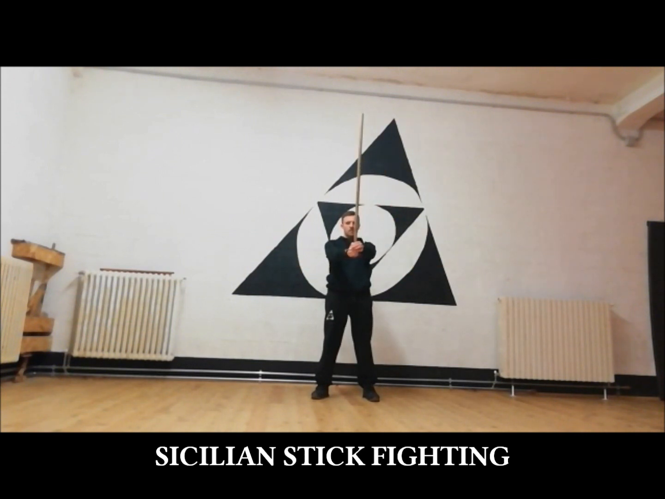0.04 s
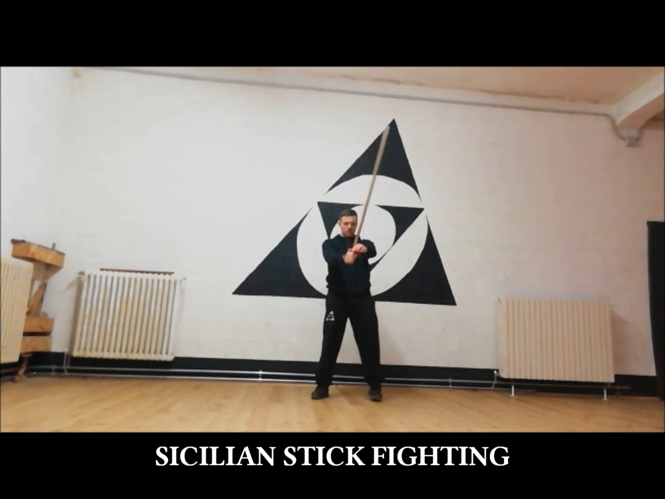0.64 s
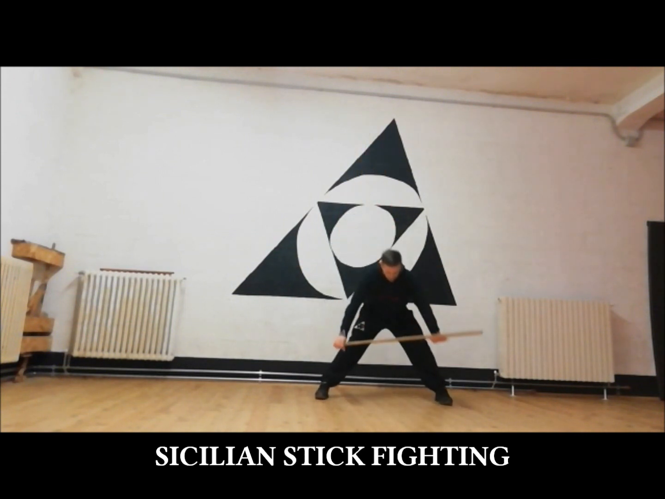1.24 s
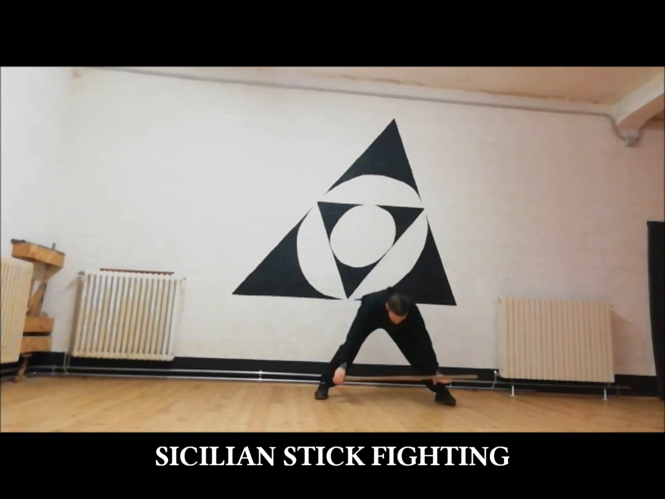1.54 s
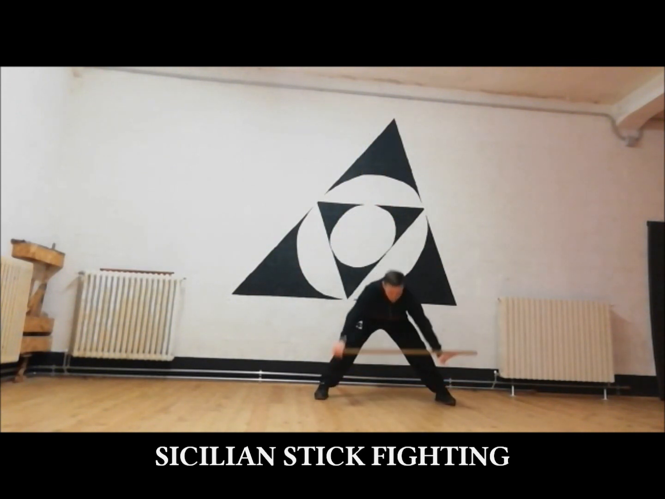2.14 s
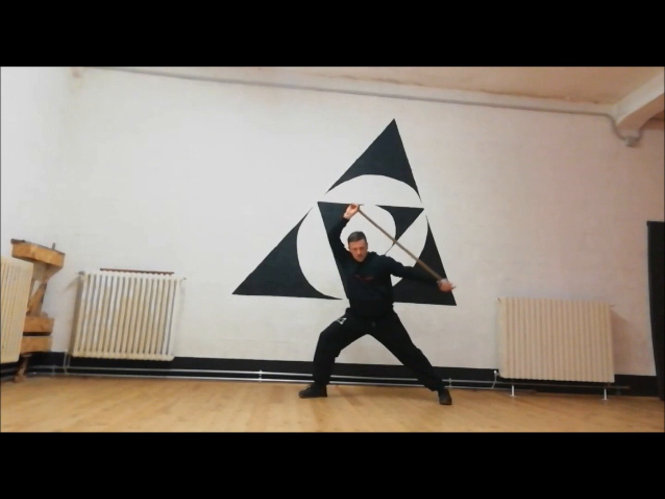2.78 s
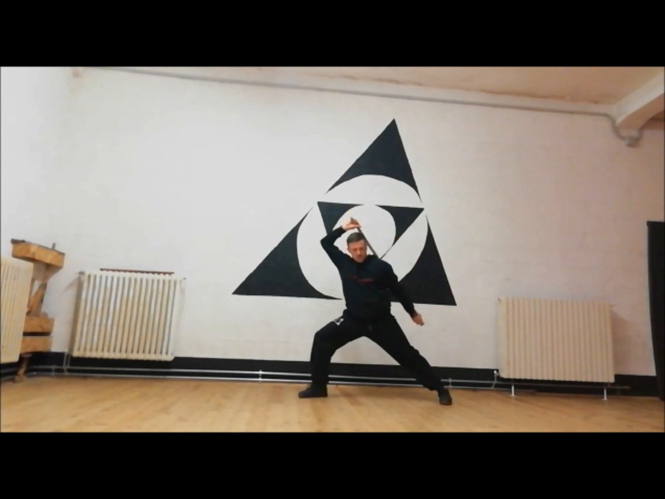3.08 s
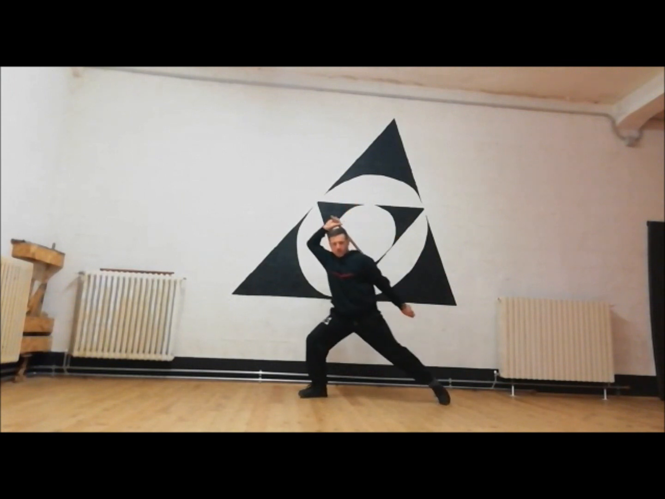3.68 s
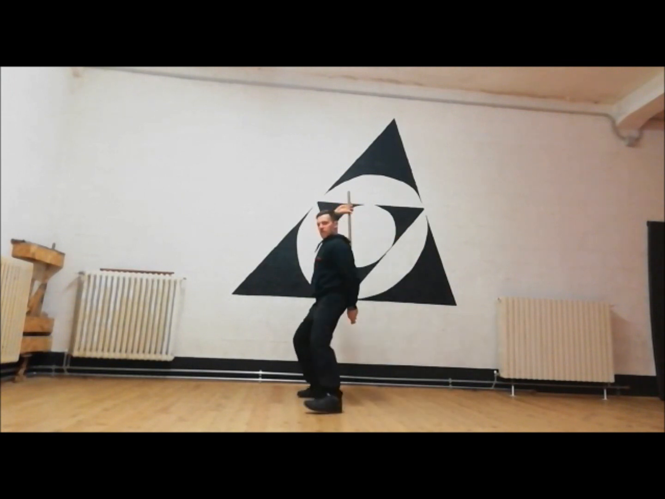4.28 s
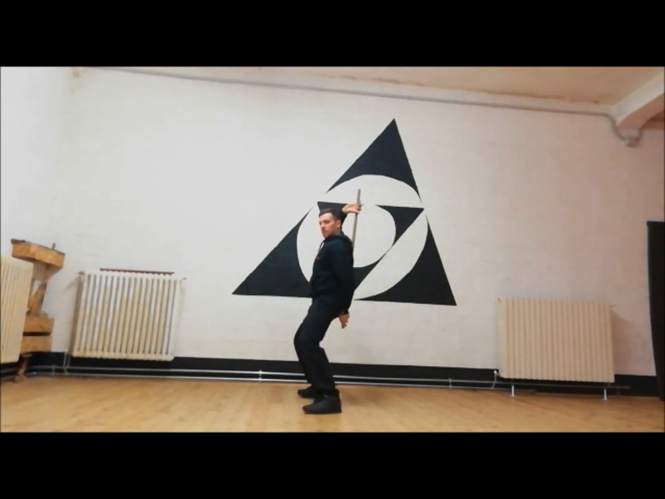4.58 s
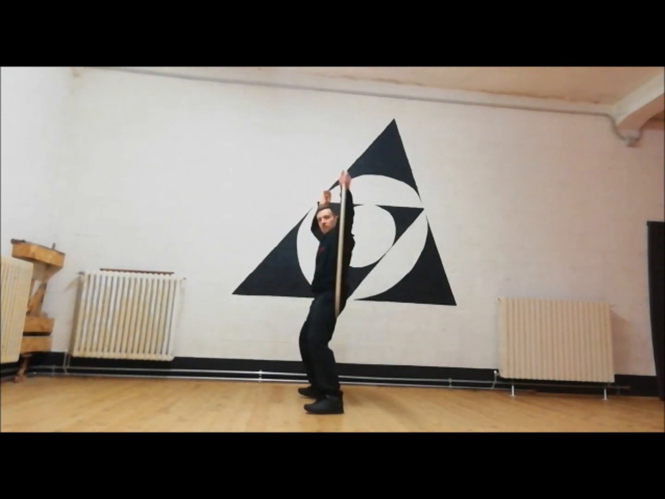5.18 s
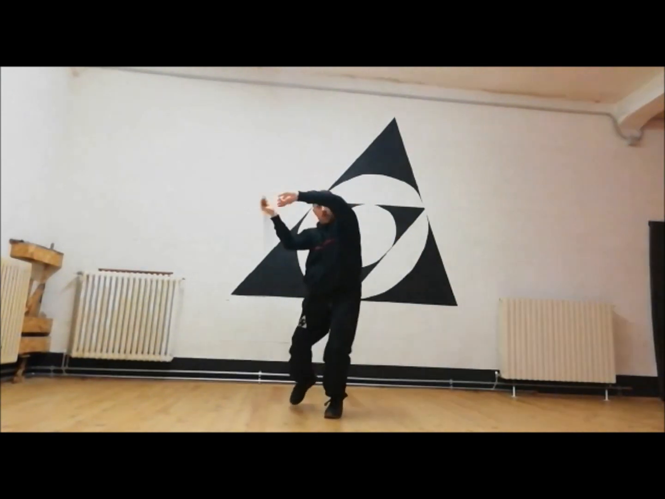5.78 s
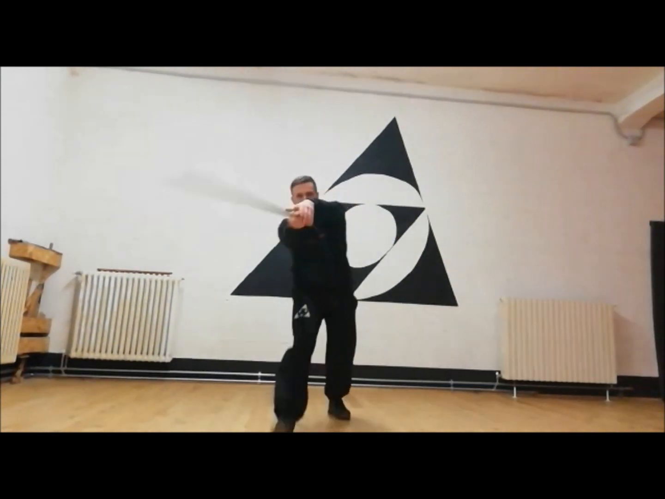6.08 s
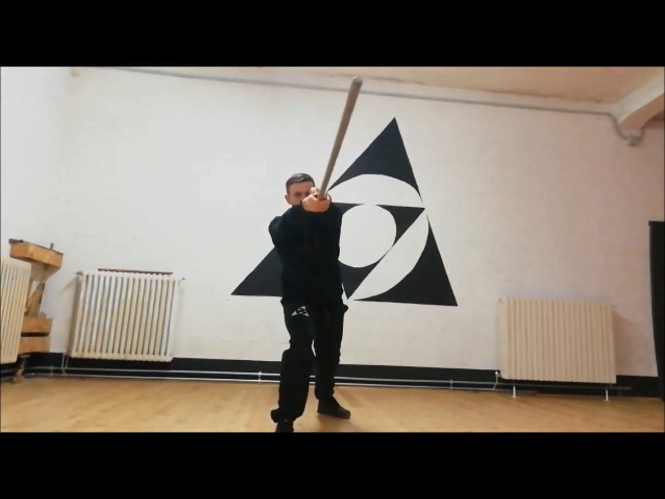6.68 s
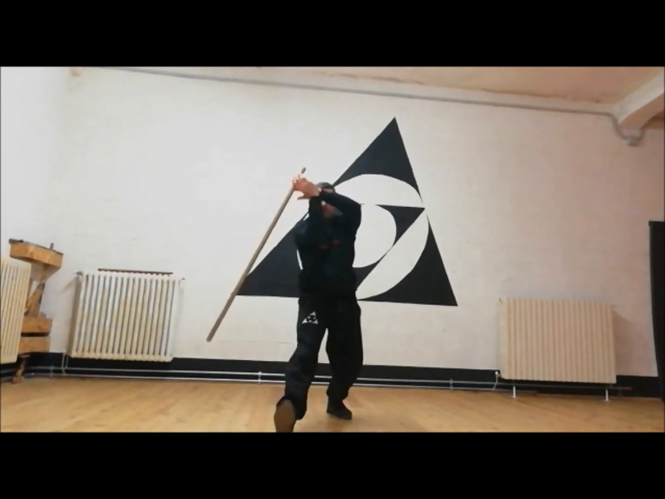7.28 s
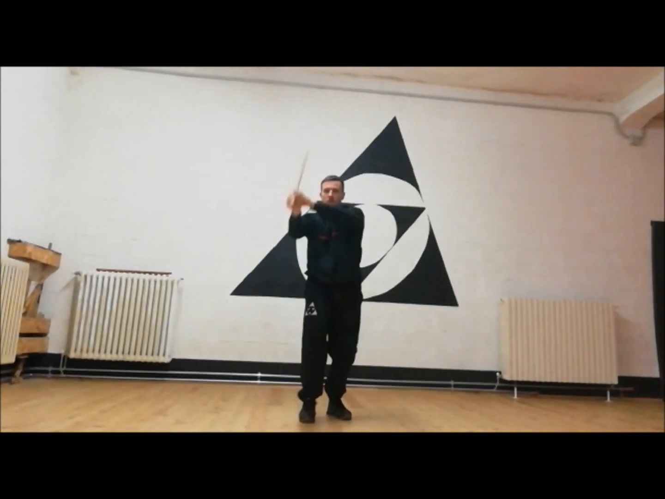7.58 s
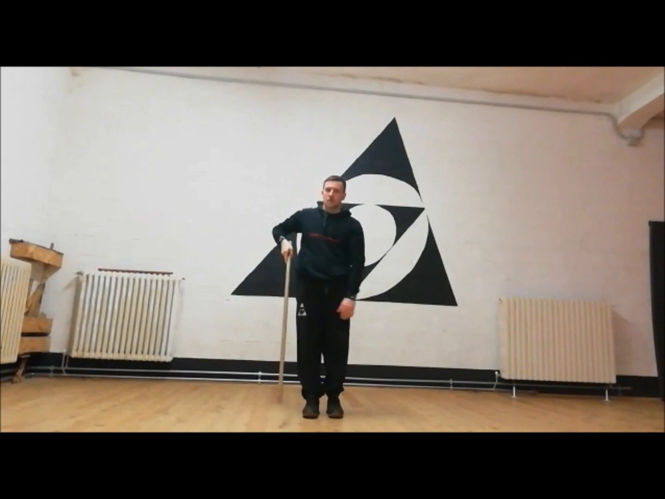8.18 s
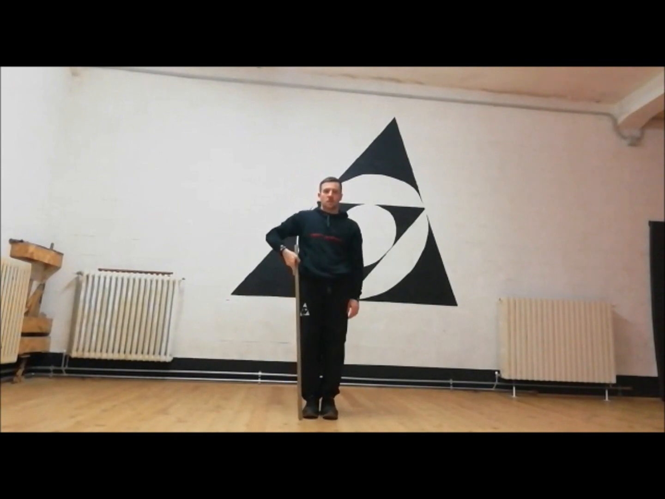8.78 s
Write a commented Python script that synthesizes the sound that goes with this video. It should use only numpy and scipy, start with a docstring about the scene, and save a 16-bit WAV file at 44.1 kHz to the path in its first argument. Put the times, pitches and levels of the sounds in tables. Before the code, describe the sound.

A low hum and faint hiss fill a bare, echoing training room. At about 1.1 seconds a few soft footfalls thud on wooden boards, which ring on briefly; faint shoe slides follow, another near 2.6. Around 3.8 come two steps and a thin squeak, then heavier steps and a scuff near 4.3. From 5 to 5.9 seconds, sleeves rustle among light steps and small wooden knocks. At about 6.2 a stick whooshes and a lunge lands with hard thuds, a slap, a knock and a short squeak, pushing a deep rumble of air at the microphone. A second burst runs from 7.3 to 7.8: quick swishes, a sharp knock and step, another puff of air, sliding soles and flapping cloth. Near 8.8 the stick's butt meets the floor with a loud, dull, hollow thud, followed by a faint slide.

```python
"""In a bare, ringing training room, someone drills with a long stick on the wooden floor.
Shoes thud, slap, slide and squeak on the boards, which ring on under every blow. Sleeves rustle,
wood knocks, lunges push the air and the stick whooshes through two strikes; at last its butt is
set down with a dull thud. A low hum and faint hiss fill the room."""
import sys
import numpy as np
from scipy import signal
from scipy.fft import rfft, irfft, next_fast_len
from scipy.io import wavfile

SR = 44100
rng = np.random.default_rng(int(sys.argv[2]) if len(sys.argv) > 2 else 0)


def to_wav(sig):
    """Store sig (one row per channel, or 1-D mono) as 16-bit WAV at the path in sys.argv[1].

    Samples outside -1..1 are clipped; the rate is SR.
    """
    pcm = np.clip(np.atleast_2d(sig), -1, 1) * 32767
    pcm = np.round(pcm).astype(np.int16)
    wavfile.write(sys.argv[1], SR, pcm.T)  # frames by channels


N = 398663

# Shoes landing. Each row: start in seconds, thud level in dB, thud pitch in Hz,
# hardness in dB (how much louder the heel's knock is than the thud).
FOOTSTEPS = [ (1.141, -52, 283, -14.5), (1.186, -53.5, 260, -10.5), (1.305, -57, 227, -13),
             (3.787, -57, 285, -7.5), (3.865, -49.5, 273, -6), (4.281, -46.5, 203, -14.5),
             (4.344, -46.5, 156, -20), (4.376, -48, 187, -23), (5.190, -58.5, 247, -11),
             (5.257, -60, 270, -2.5), (5.725, -56.5, 296, -11), (5.851, -45, 249, -12),
             (5.902, -49.5, 238, -14.5), (6.219, -49, 225, -1), (6.260, -47.5, 300, 6.5),
             (6.273, -38, 286, -21), (6.279, -39, 162, -8), (7.375, -60, 264, -10), (7.439, -56, 228, -5.5),
             (7.481, -41, 312, -2), (7.628, -49.5, 292, -0.5), (7.777, -53.5, 327, -15.5),
             (8.656, -64, 258, -9.5)]
# The tone of a sole slapping the floor. Each row: frequency in Hz, level in dB.
SOLE_TONE = [(300, -14), (1000, -4.5), (1850, 2.5), (2150, -3), (2600, -3), (3300, -4.5), (4500, -12.5),
             (6300, -14), (7800, -29), (11000, -30), (15000, -30.5)]
# Sliding: shoes, trouser legs, and near 2.56 s the stick sliding through the hands. Each row: loudest moment in
# seconds, # time to swell (and again to fade) in seconds, level in dB, middle frequency in Hz.
SLIDES = [(1.28, 0.14, -62.5, 1600), (1.63, 0.046, -73, 1300), (2.56, 0.12, -57, 2800),
          (4.36, .093, -58, 2760), (5.37, 0.027, -61, 1874), (6.157, 0.047, -50, 3780),
          (6.51, 0.071, -48.5, 1900), (7.387, 0.039, -49, 2150), (7.68, 0.067, -46.5, 1910),
          (8.53, 0.099, -65, 2340), (8.98, 0.18, -61.5, 3950)]


def amp(db):
    """Turns decibels into a number to multiply by."""
    return 10 ** (np.asarray(db) / 20)


def look_up(table, hz):
    """Reads a table at any frequency, joining its rows with straight lines on a pitch scale."""
    row_hz, values = np.transpose(table)
    return np.interp(np.log(hz + 1), np.log(row_hz), values)


def unit_power(x):
    """Scales a signal so that its average power is 1."""
    return x / np.sqrt(np.mean(x ** 2) + 1e-20)


def at_level(x, db):
    """Gives a short sound the energy of a tenth of a second at this level."""
    return amp(db) * x * np.sqrt(SR / 10 / (np.sum(x ** 2) + 1e-20))


def add(mix, start, sound):
    """Mixes a sound in at a start time in seconds."""
    part = mix[max(round(start * SR), 0):][:len(sound)]
    part += sound[:len(part)]


def freqs(size):
    """The frequencies in Hz that make up a sound of this many samples."""
    return np.fft.rfftfreq(size, 1 / SR)


def colour(x, tone):
    """Turns each frequency up or down as a tone table says."""
    return irfft(rfft(x) * amp(look_up(tone, freqs(x.shape[-1]))), x.shape[-1])


def tap_response(tone, size=4096):
    """The sound that a thing with this tone makes after one perfectly sharp tap."""
    log_gain = np.log(amp(look_up(tone, abs(np.fft.fftfreq(size, 1 / SR)))))
    return np.fft.ifft(np.exp(np.conj(signal.hilbert(log_gain)))).real[:size // 2]


def wander(size, hz):
    """A smooth random wobble that changes about hz times a second."""
    smoothing = np.exp(-(freqs(size) / hz) ** 2)
    return unit_power(irfft(rfft(rng.standard_normal(size)) * smoothing, size))


def stroke(rise, fall):
    """A movement that swells and fades. It lasts one second, so add it 0.5 s before its peak."""
    t = np.arange(SR) / SR - .5
    return np.exp(-(t / np.where(t < 0, rise, fall)) ** 2)


def short_note(hz, swell):
    """One pitch that grows for swell seconds and dies away."""
    t = np.arange(SR // 6) / SR
    return np.sin(2 * np.pi * hz * t) * t / swell * np.exp(-t / swell)


def even_out(burst, lead, amount=0.71):
    """Evens out a burst's frequencies, as when many small contacts add up; puts lead seconds in front."""
    spectrum = rfft(np.pad(burst, (round(lead * SR), 0)))
    return irfft(spectrum / (abs(spectrum) + 1e-12) ** amount)


def surrounding_noise(size):
    """Noise from all around: left and right share the bass but differ through most of the treble."""
    # Each row: frequency in Hz, how alike the sides are (1 the same, 0 unrelated, below 0 opposed).
    likeness = [(30, 1), (130, 0.96), (260, 0.86), (500, -0.47), (900, 0.26), (2000, -0.23), (16000, 1)]
    left, other = rfft(rng.standard_normal((2, size)))
    alike = np.clip(look_up(likeness, freqs(size)), -1, 1)
    right = alike * left + np.sqrt(1 - alike ** 2) * other
    return irfft([left, right], size)


def background(air_db=-61.5, waver_db=2, drift_cycles=0.14):
    """The room's air rumbles and hisses faintly under a wavering machine hum."""
    # The tone of the rumble and hiss. Each row: frequency in Hz, relative level in dB.
    air_tone = [(15, -5.5), (35, 0), (62, 3.5), (100, -9.5), (130, -5), (230, -13.5), (400, -18),
                (650, -23.5), (2000, -25), (6300, -34), (7700, -38), (11000, -34.5), (15000, -32),
                (16000, -37)]
    # The notes of the hum. Each row: pitch in Hz, level in dB.
    hum_notes = [(60, -61.5), (89, -67), (150, -77.5), (359, -83), (399, -89.5), (478, -89)]
    t, size = np.arange(N) / SR, next_fast_len(N)
    air = colour(surrounding_noise(size), air_tone)[:, :N]
    swell_db = waver_db * wander(size, hz=3)[:N]
    drift = drift_cycles * wander(size, hz=3)[:N]
    hum = sum(amp(db + swell_db) * np.sin(2 * np.pi * (hz * t + drift + rng.random()))
              for hz, db in hum_notes)
    return amp(air_db) * unit_power(air) + np.sqrt(2) * hum


def clothes_rustle(slide_offset_db=-6.5, step_offset_db=-10.5, clump_db=3.5):
    """Cloth creases in quick clumps of hiss when an arm moves, something slides or a step jerks the body."""
    # Sleeves flapping. Each row: loudest moment in seconds, swell and fade time in seconds, level in dB.
    sleeve_flaps = [(1.0, .07, -69.5), (3.88, 0.053, -62), (5.0, 0.11, -62), (5.273, 0.0024, -64.5),
                    (5.855, 0.073, -59.5), (6.498, .003, -70), (6.719, 0.015, -56.5), (7.482, .003, -51.5),
                    (7.51, 0.0046, -53.5), (7.673, 0.024, -49.5), (7.75, .055, -48)]
    # The tone of creasing cloth. Each row: frequency in Hz, level in dB.
    cloth_tone = [(300, -5), (1500, 5), (4000, 3), (6300, 8.5), (7800, -0.5), (10500, 1.5), (13000, -3),
                  (15000, -3.5), (16000, -2)]
    power = np.zeros(N)
    for peak, length, db in sleeve_flaps:
        add(power, peak - .5, at_level(stroke(length, length), db) ** 2)
    for peak, length, db, _ in SLIDES:
        add(power, peak - .5, at_level(stroke(length, length), db + slide_offset_db) ** 2)
    for start, thud_db, _, hardness in FOOTSTEPS:
        jerk_db = thud_db + step_offset_db + .6 * hardness
        add(power, start - .5, at_level(stroke(rise=0.02, fall=0.06), jerk_db) ** 2)
    size = next_fast_len(N)
    clumps = rng.standard_normal(size) * amp(clump_db * wander(size, hz=300))
    creases = colour(clumps, cloth_tone)[:N]
    return unit_power(creases) * np.sqrt(power)


def wood_knocks():
    """Struck wood rings briefly at one pitch, with higher notes (overtones) when it is hit squarely."""
    # Hollow knocks of stick, heel and boards. Each row: start in seconds, level in dB, pitch in Hz,
    # swell time in seconds, overtone level in dB compared with the main note.
    knocks = [(0.978, -81, 1350, 0.00061, -13), (3.786, -69.5, 1170, 0.0014, -19),
              (3.867, -65, 1098, 0.0041, -21), (5.255, -58.5, 925, .0018, -25),
              (5.724, -73, 888, 0.002, -22), (5.852, -58, 800, 0.0011, -22),
              (6.2204, -56.5, 1320, .0002, -2.5), (6.262, -45, 1130, .002, -5),
              (7.477, -48.5, 1605, 0.0011, -27), (7.4823, -41, 1017, 0.00055, -18)]
    # A knock's higher notes. Each row: multiple of the pitch, extra level in dB.
    overtones = [(1.64, -9.5), (2.24, 1)]
    out = np.zeros(N)
    for start, db, hz, swell, overtones_db in knocks:
        add(out, start, at_level(short_note(hz, swell), db))
        for multiple, extra_db in overtones:
            add(out, start, at_level(short_note(hz * multiple, swell), db + overtones_db + extra_db))
    return out


def floor_ring(blows, ring_db=-66):
    """The springy floor rings on with its own low notes after each blow."""
    # Each row: pitch in Hz, relative level in dB, seconds to fade by 60 dB.
    floor_notes = [(117.3, 10, 1.4), (147.2, -4, 0.97), (175.4, 2.5, 1.3), (180, -5, 1.2),
                   (243.6, -1.5, 0.44), (281, 10, 0.62), (307.8, 8, 0.54), (348.6, 15, 0.28)]
    t = np.arange(SR) / SR
    ringing = sum(amp(db - 60 * t / fade) * np.sin(2 * np.pi * hz * t) for hz, db, fade in floor_notes)
    return amp(ring_db) * signal.fftconvolve(blows, ringing)[:N]


def footfalls(thud_cycles=0.48, heel_grit=0.22, grit_spread_db=3, lead_s=.02):
    """A shoe thuds on the boards, knocks with its heel and slaps as the sole rolls flat."""
    # The tone of a heel's knock. Each row: frequency in Hz, level in dB.
    heel_tone = [(150, -23.5), (330, -12), (500, -3), (700, -10.5), (950, -8), (1220, -11), (1500, -13),
                 (2200, -25), (5000, -42), (16000, -99)]
    out, t = np.zeros(N), np.arange(SR // 6) / SR
    heel, sole = tap_response(heel_tone), tap_response(SOLE_TONE)
    for start, thud_db, hz, hardness in FOOTSTEPS:
        add(out, start, at_level(short_note(hz, thud_cycles / hz), thud_db))
        roll_s = .004 * np.exp(-hardness / 17)  # harder steps roll flat sooner
        slap_db = thud_db + 0.5 + 1.67 * hardness  # and slap louder
        heel_noise, sole_noise, lumps = rng.standard_normal((3, len(t)))
        contact = (t / roll_s * np.exp(-t / roll_s)) ** 2 * amp(grit_spread_db * lumps)
        strike = heel_grit * heel_noise * contact / np.linalg.norm(contact)
        add(strike, min(roll_s, .004), np.array([.15]))  # the heel's edge lands first
        knock = signal.fftconvolve(even_out(strike, lead_s), heel)
        slap = signal.fftconvolve(even_out(sole_noise * contact, lead_s), sole)
        add(out, start - lead_s, at_level(knock, thud_db + hardness))
        add(out, start - lead_s, at_level(slap, slap_db))
    return out


def rub(speed, hz, octaves, catch_db=3, low_cut_hz=650, high_cut_hz=6900):
    """Rubbing catches and slips unevenly, making a band of noise around hz; octaves sets its width."""
    slips = rng.standard_normal(SR) * amp(catch_db * wander(SR, hz=130)) * speed
    f = freqs(SR)
    band = np.exp(-.5 * (np.log2((f + 1) / hz) / octaves) ** 2)
    edge_cut = np.sqrt(1 + (low_cut_hz / (f + 1)) ** 4 + (f / high_cut_hz) ** 20)
    return irfft(rfft(slips) * band / edge_cut, SR)


def slides(typical_s=0.078, typical_octaves=1.6):
    """A slide makes a broad hiss that swells and fades; longer slides spread over more pitches."""
    out = np.zeros(N)
    for peak, length, db, hz in SLIDES:
        octaves = typical_octaves * (length / typical_s) ** 0.78
        add(out, peak - .5, at_level(rub(stroke(length, length), hz, octaves), db))
    return out


def squeaks(rise_share=0.18):
    """A rubber sole grips the floor with a sudden, thin squeak."""
    # Each row: loudest moment in seconds, fade time in seconds, level in dB, pitch in Hz.
    grips = [(3.795, 0.0093, -57, 3950), (3.811, 0.17, -57, 3580), (4.232, .0044, -73, 6000),
             (5.271, .02, -63, 2800), (6.264, 0.0061, -47, 4460), (7.4813, 0.0013, -52.5, 4800),
             (7.511, 0.0017, -58, 4960)]
    out = np.zeros(N)
    for peak, fall, db, hz in grips:
        squeak = rub(stroke(rise_share * fall, fall), hz, octaves=0.38)
        add(out, peak - .5, at_level(squeak, db))
    return out


def draughts(rumble_top_hz=100):
    """Air pushed by the lunging body arrives as a deep, buffeting rumble."""
    # Each row: strongest moment in seconds, rise time in seconds, fall time in seconds, level in dB.
    gusts = [(6.158, .075, 0.031, -48), (6.319, 0.073, 0.32, -41.5), (7.428, 0.036, 0.11, -49.5)]
    out = np.zeros(N)
    for peak, rise, fall, db in gusts:
        add(out, peak - .5, at_level(wander(SR, rumble_top_hz) * stroke(rise, fall), db))
    return out


def whooshes(top_hz=1170, resting_share=.6, spread_hz=520, follow_through=1.45):
    """The swung stick sheds swirls of air: a breathy tone that rises and falls with its speed."""
    # Each row: moment of top speed in seconds, time to speed up in seconds, level in dB.
    swings = [(6.17, 0.069, -57), (7.340, 0.00835, -56), (7.383, .026, -52.5), (7.59, 0.04, -45)]
    out = np.zeros(N)
    for peak, rise, db in swings:
        speed = stroke(rise, fall=follow_through * rise)
        pitch_hz = top_hz * (resting_share + (1 - resting_share) * speed)
        phase = 2 * np.pi * np.cumsum(pitch_hz) / SR
        swirls = wander(SR, spread_hz) * np.cos(phase) + wander(SR, spread_hz) * np.sin(phase)
        add(out, peak - .5, at_level(swirls * speed, db))
    return out


def stick_set_down(contact_s=0.00022, settle_s=0.00186, scrape_offset_db=-28, scrape_s=0.018):
    """The stick's butt touches the floor, then settles: one dull, hollow blow and a faint scrape."""
    # Each row: start in seconds, level in dB.
    landings = [(8.7699, -31.5)]
    # The tone of the blow. Each row: frequency in Hz, level in dB.
    butt_tone = [(60, -51), (130, -9), (195, 0), (290, 6), (360, -1.5), (480, -7.5), (650, -2.5),
                 (900, -4.5), (1150, -4.5), (1450, -15), (2200, -12.5), (4000, -39), (9000, -58)]
    out, t = np.zeros(N), np.arange(SR // 8) / SR
    first_touch = 0.31 * np.exp(-((t - 3 * contact_s) / contact_s) ** 2)
    full_weight = np.exp(-((t - settle_s) / contact_s) ** 2)
    blow = signal.fftconvolve(tap_response(butt_tone), first_touch + full_weight)
    for start, db in landings:
        grit = rng.standard_normal(len(t)) * t * np.exp(-t / scrape_s)
        scrape = signal.fftconvolve(tap_response(SOLE_TONE), grit)
        add(out, start, at_level(blow, db))
        add(out, start, at_level(scrape, db + scrape_offset_db))
    return out


def room(sound, near, build_s=0.0044):
    """Sound arrives directly, then as wall echoes and a long ringing tail; near gets no echo or tail."""
    # How long the room rings. Each row: frequency in Hz, seconds to fade by 60 dB.
    fade_times = [(100, 1.85), (250, 1.17), (600, 1.0), (1200, 1.22), (2500, 1.4), (5000, 1.24),
                  (8000, 0.87), (15000, 1)]
    # The tone of the reflected sound. Each row: frequency in Hz, level in dB.
    reflected_tone = [(100, 3.5), (200, 1.5), (305, 1.5), (400, 5), (540, 2.5), (1000, 2.5), (3300, -1.5),
                      (4500, -9.5), (6300, -8), (8500, -13), (15000, -12)]
    # The first echoes off the walls. Each row: delay in seconds, relative level in dB.
    wall_echoes = [(.0055, -17.5), (0.0157, -26), (0.0159, -9), (.0235, -57), (0.045, -45)]
    # The tone of the direct sound on each side. Each row: frequency in Hz, level in dB.
    left_tone = [(100, -11.5), (1000, -4), (3000, -3.5), (6500, -24.5), (9000, -9), (15000, 4)]
    right_tone = [(100, -13.5), (1000, -7.5), (3000, -8.5), (6500, -5.5), (9000, -15), (15000, -23)]
    t = np.arange(SR * 3 // 2) / SR
    hz, when, bands = signal.stft(surrounding_noise(len(t)), SR, nperseg=512)
    fade_s = look_up(fade_times, hz)[:, None]
    equal_energy = np.sqrt(2 * np.log(1000) / (fade_s * SR))  # slow-fading bands start quieter
    bands = bands * amp(-60 * when / fade_s) * equal_energy
    build_up = 1 - np.exp(-(t / build_s) ** 2)
    tail = signal.istft(bands, SR, nperseg=512)[1][:, :len(t)] * build_up
    for delay, db in wall_echoes:
        for side in tail:
            add(side, delay + rng.uniform(0, 0.00037), amp([db]))
    reflected = signal.fftconvolve(colour(sound, reflected_tone)[None], tail, axes=1)[:, :len(sound)]
    direct = np.array([colour(sound + near, left_tone), colour(sound + near, right_tone)])
    return reflected + direct


def scene(near_knock_db=4):
    """Blows and movement ring through the room, over its steady background."""
    wood = wood_knocks()
    blows = footfalls() + wood + stick_set_down()
    action = blows + whooshes() + slides() + squeaks() + clothes_rustle()
    end_silence = (0, next_fast_len(N + SR // 4) - N)
    near_knocks = np.pad(amp(near_knock_db) * wood, end_silence)
    in_room = room(np.pad(action, end_silence), near_knocks)[:, :N]
    return in_room + floor_ring(blows) + draughts() + background()


def record(dry):
    """Cuts away the very highest treble, above 15800 Hz."""
    treble_cut = signal.firwin(511, 15800, window=("kaiser", 9), fs=SR)
    return signal.oaconvolve(dry, treble_cut[None], "same")


dry = scene()
out = record(dry)
to_wav(out)
```